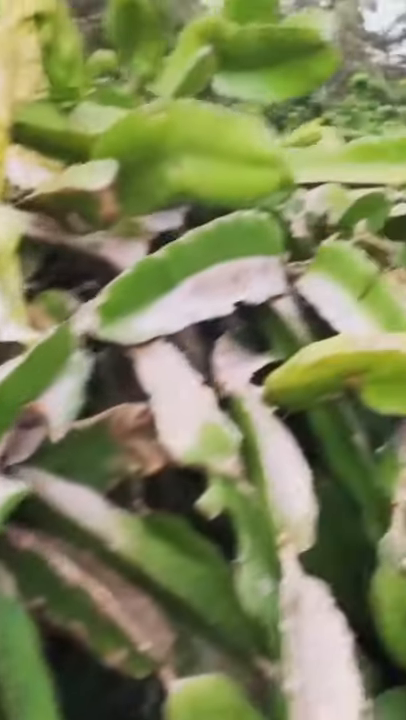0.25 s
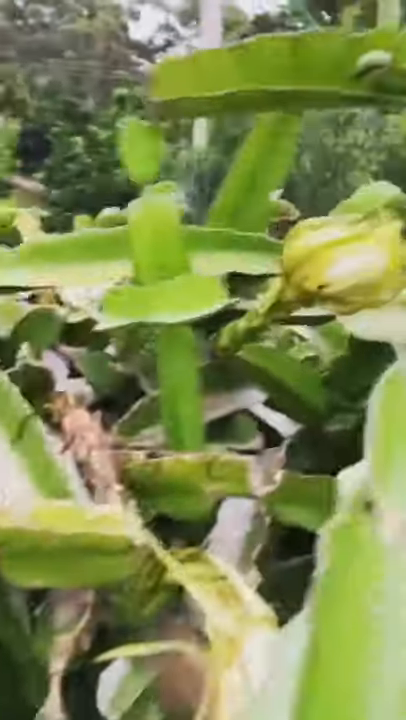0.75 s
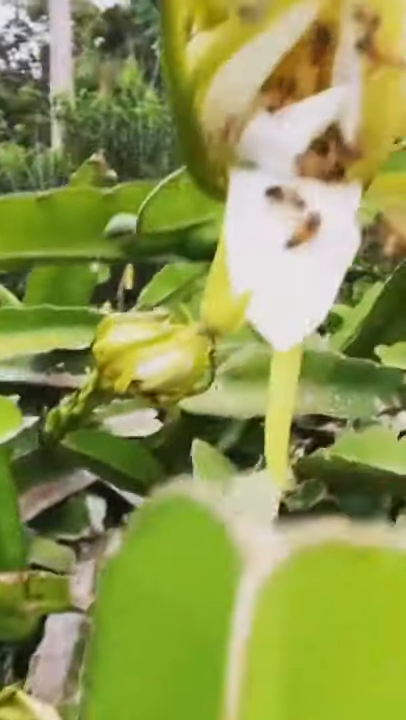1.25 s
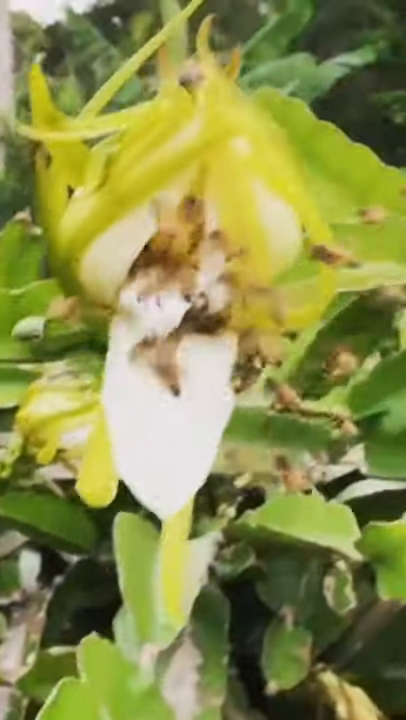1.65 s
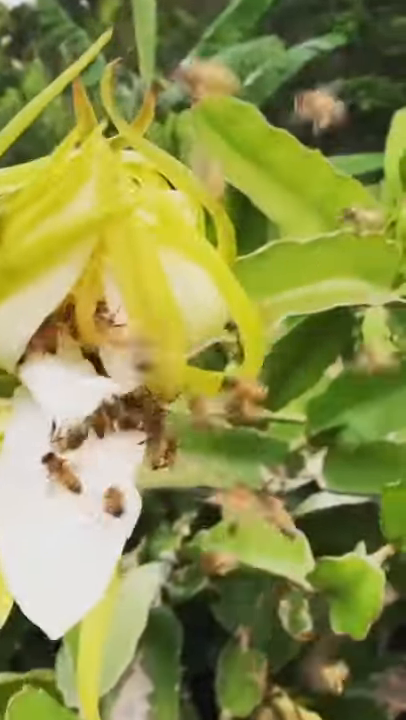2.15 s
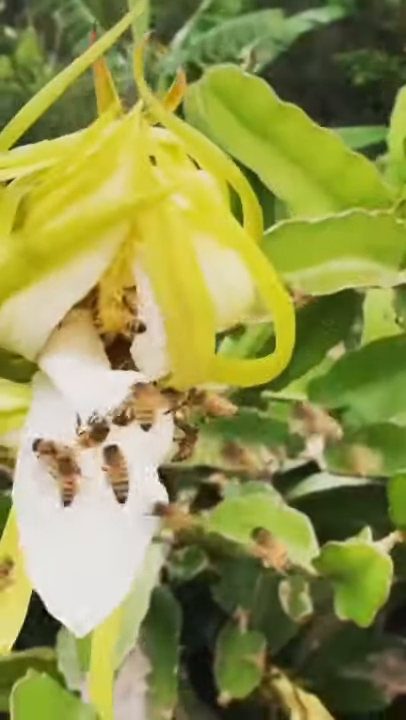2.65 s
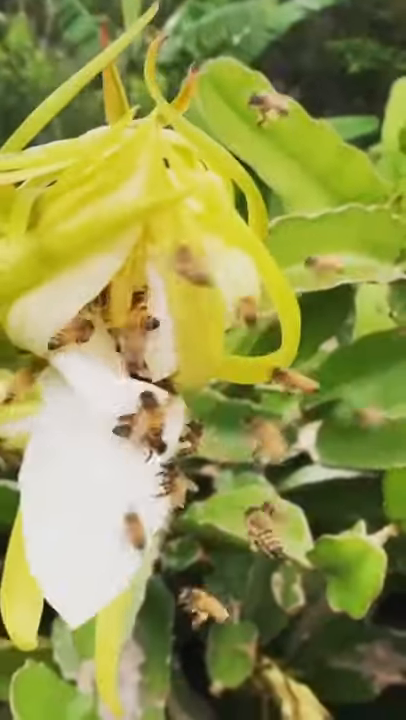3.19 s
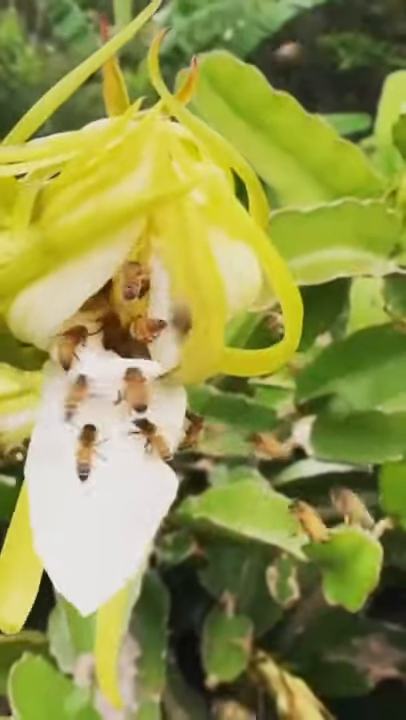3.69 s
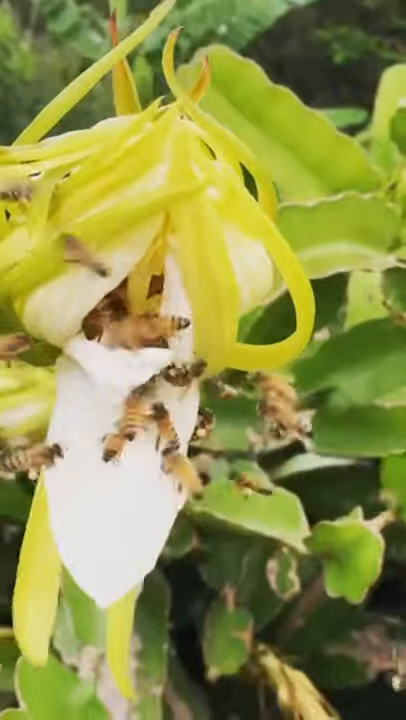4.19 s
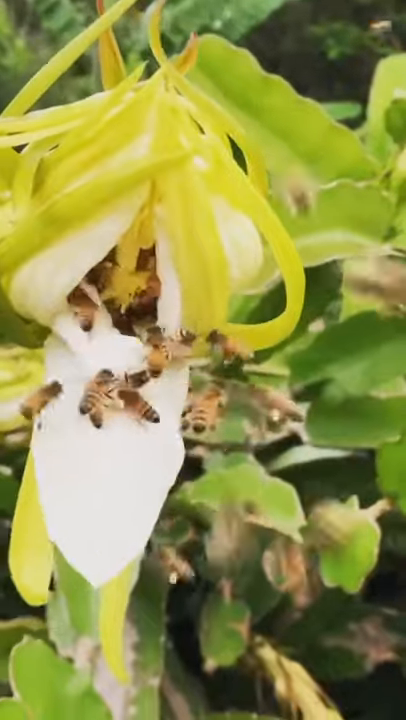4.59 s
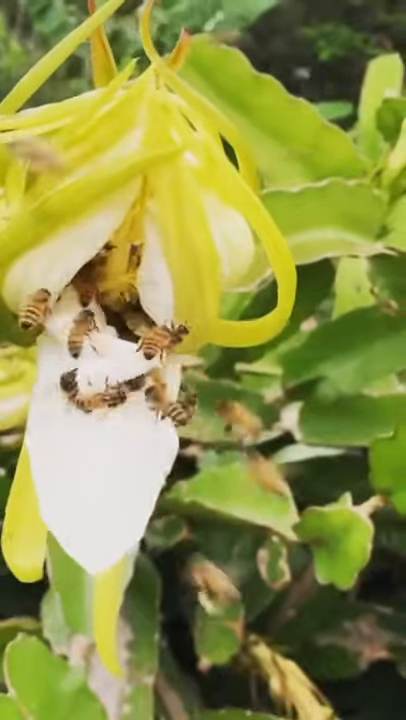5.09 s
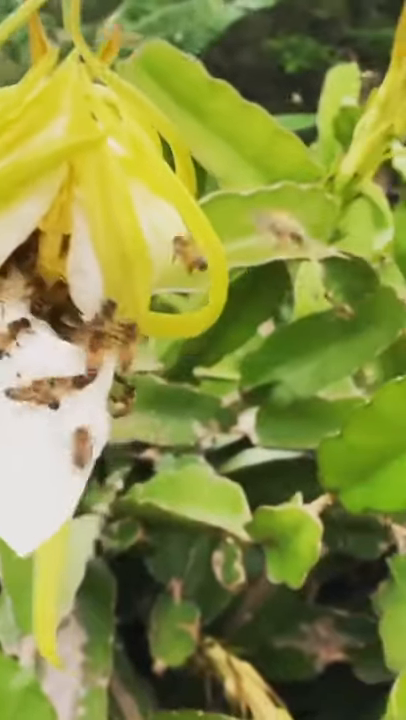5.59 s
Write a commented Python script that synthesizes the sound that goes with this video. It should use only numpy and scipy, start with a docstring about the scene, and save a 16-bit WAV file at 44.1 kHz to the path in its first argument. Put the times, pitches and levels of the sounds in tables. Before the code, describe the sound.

Close to a hand-held microphone in a garden, many bees buzz continuously at a flower. Early on, a few dart right past, their buzz surging and bending in pitch while their wings puff dull thumps against the microphone. Three more brief passes follow, then a bee swerves about and others hover in and out. A faint bed of airy hiss, high far insects and breeze rumble sits underneath, dipping briefly a few times.

```python
"""Honey bees at a cactus flower

Wingbeats hum close to a hand-held two-port microphone: a crowd forms the bed, the nearest bee
stands out, and now and then one skims the ports, which thump in its wing wash. Behind them are
shrill far insects, garden air, hiss, a low rumble and a faint whine and drone. The background
sinks into one long, shallow lull and three shorter, deeper dips."""
import sys
import numpy as np
from scipy import signal
from scipy.fft import rfft, irfft
from scipy.io import wavfile

SR = 44100
rng = np.random.default_rng(int(sys.argv[2]) if len(sys.argv) > 2 else 0)


def int16_out(signal):
    """Quantize to a 16-bit WAV file."""
    q = np.round(np.clip(np.atleast_2d(signal).T, -1, 1) * 32767)
    wavfile.write(sys.argv[1], SR, q.astype(np.int16))


N = 257544
TIME = np.arange(N) / SR
SIDES = np.array([[-.5], [.5]])  # splits a difference between the left and right ports


def amp(db):
    """Decibels to gain."""
    return 10 ** (np.asarray(db) / 20)


def unit(x):
    """Scales to rms 1."""
    return x / np.sqrt(np.mean(x ** 2) + 1e-20)


def at_hz(points, hz):
    """Reads a spectrum on a log-frequency axis."""
    f, value = np.transpose(points)
    return np.interp(np.log(hz + 1), np.log(f), value)


def curves(rows, x):
    """Reads each further column of a table where its first column is x."""
    first, *columns = np.transpose(rows)
    return [np.interp(x, first, c) for c in columns]


def drift(rate_hz):
    """Smooth random modulation of rms 1 that moves up to about rate_hz."""
    count = 2048
    f = np.fft.rfftfreq(count, N / SR / count)
    slow = irfft(rfft(rng.standard_normal(count)) * (f > 0) / np.sqrt(1 + (f / rate_hz) ** 4))
    return np.interp(TIME, np.linspace(0, N / SR, count), unit(slow))


def dip_db():
    """Ducking of the background: each dip falls quickly, stays down, then creeps back."""
    # one long, shallow lull and three shorter, deeper dips:
    # start/s, fall/s, hold/s, recovery/s, depth/dB
    dips = [(1.58, 0.017, 1.64, 0.013, 3), (1.585, 0.035, 0.28, 0.21, 13.5),
            (3.003, 0.094, 0.19, 0.038, 6.5), (5.462, 0.13, 0.041, 0.015, 5)]
    return -sum(depth * np.clip((TIME - start) / fall, 0, 1)
                * np.exp(-np.maximum(TIME - start - fall - hold, 0) / recovery)
                for start, fall, hold, recovery, depth in dips)


def noise_pair(spectrum):
    """Coloured ambient noise: it reaches the right port a little later and only partly alike."""
    # stereo image at the ports: f/Hz, likeness/0-1, left lead/rad, right over left/dB
    ports = [(0, 1, 0, 0), (200, .99, 0, 0), (1000, .3, 0, 2.5), (2200, .55, 1.6, 1), (3000, .5, 1.1, 0),
             (3900, .75, 2.05, 0), (4400, .99, 2.95, 0), (5000, .99, 3.4, 0), (5700, .85, 4.7, 0),
             (6500, .97, 6, 0), (7400, .97, 6.6, 0), (8000, .8, 7.9, 0), (8950, .99, 9.42, 0),
             (11050, .9, 12.57, 0), (13150, .98, 15.7, 0), (15100, .92, 18.8, 0)]
    hz = np.fft.rfftfreq(N, 1 / SR)
    left, unrelated = rfft(rng.standard_normal((2, N)))
    likeness, lead, right_db = curves(ports, hz)
    blend = likeness * left + np.sqrt(1 - likeness ** 2) * unrelated
    right = blend * np.exp(-1j * lead) * amp(right_db)
    return unit(irfft(np.array([left, right]) * amp(at_hz(spectrum, hz)), N))


def crowd(count=12, centre_hz=255, spread=.04, wander=.036, jitter=.0066, roam_db=5, right_db=3):
    """Many bees hum, each with its own wandering wingbeat, distance and bearing."""
    # overtone colour of a wing stroke: f/Hz, relative level/dB
    tone = [(760, 6.5), (1050, 5.5), (1300, 7), (1600, 5.5), (1850, -2), (2200, -32), (3200, -3.5),
            (4500, -68)]
    # fader ride of the crowd: t/s, level/dB
    ride = [(0, -51.5), (1.5, -52), (2.4, -55), (3.7, -53), (4.6, -54), (5.1, -56), (5.55, -57),
            (5.84, -52)]
    steps, lag_s = 1024, .00033  # wavetable size; longest delay between the ports
    orders = np.arange(3, 18)
    weights = amp(at_hz(tone, orders * centre_hz))
    cycle = np.linspace(0, 1, steps + 1)
    hum, octave, overtones = np.zeros((3, 2, N))
    for detune in np.linspace(-1, 1, count):
        hz = centre_hz * (1 + spread * detune + wander * drift(9) + jitter * drift(37.8))
        beats = np.cumsum(hz) / SR + SIDES * hz * lag_s * np.tanh(drift(0.98))
        index = (beats % 1 * steps).astype(int)
        nearness = amp(roam_db * drift(20.4))
        stroke = np.cos(2 * np.pi * (np.outer(cycle, orders) + rng.random(len(orders)))) @ weights
        hum += nearness * np.cos(2 * np.pi * cycle)[index]
        octave += nearness * np.cos(4 * np.pi * cycle)[index]
        overtones += nearness * stroke[index]
    # the crowd ducks part of the way with the background, its overtones a little further
    level = curves(ride, TIME)[0] + 0.27 * dip_db()
    return (unit(hum) * amp(level - 2)
            + unit(octave) * amp(level - 1 + SIDES * right_db / 2)
            + unit(overtones) * amp(level + 1 + 0.084 * dip_db() + SIDES * right_db))


def near_bee(span, hz, fundamental_db, octave_db, overtone_db, bright_hz, fall_db, hollow_db, jitter):
    """One bee: each wing stroke gives a fundamental, an octave, a hump of overtones and a puff of air."""
    flutter_db, right_db, puff_db = 2.8, 4, -15
    twist_rad, bearing_rad, fade_s = 0.44, 0.12, .015
    t = TIME[span]
    phase = 2 * np.pi * np.cumsum(hz * (1 + jitter * drift(44.5)[span])) / SR
    # the shape of the stroke, as the microphone hears it, twists while the bee turns
    slip = twist_rad * drift(10)[span] + SIDES * bearing_rad * drift(4.9)[span]
    octave = amp(octave_db + SIDES * right_db / 6) * np.cos(2 * phase + slip)
    buzz = amp(fundamental_db) * np.cos(phase) + octave
    orders = np.arange(3, 13)
    octaves_off_peak = abs(np.log2(orders * np.mean(hz) / bright_hz))
    hump = amp(-fall_db * octaves_off_peak - hollow_db * (orders % 2 == 0))
    for order, share in zip(orders, hump / np.linalg.norm(hump)):
        # the overtones beam, so they flutter and shift between the ports as the bee turns
        level = overtone_db + flutter_db * drift(19.5)[span]
        slip = 2 * np.pi * rng.random() + twist_rad * drift(12.4)[span] + SIDES * drift(2.7)[span]
        buzz += share * amp(level + SIDES * right_db) * np.cos(order * phase + slip)
    air_band = signal.butter(2, (600, 2000), "band", fs=SR, output="sos")
    stirred_air = signal.sosfilt(air_band, rng.standard_normal((2, N))[:, span])
    buzz += amp(overtone_db + puff_db) * unit(stirred_air * (1 + np.cos(phase)))
    fade = np.clip(np.minimum(t - t[0], t[-1] - t) / fade_s, 0, 1)
    out = np.zeros((2, N))
    out[:, span] = -np.sqrt(2) * buzz * fade
    return out


def hovering_bees(arrive_s=0.033, leave_s=0.053, sway=.021, bob_db=2.5):
    """Bees drift in, hang at the flower and leave: wingbeats sway, low partials bob as they turn."""
    # visits: start/s, length/s, wingbeat/Hz, fundamental/dB, octave over it/dB,
    # overtones over both/dB, brightest f/Hz
    visits = [(0, 0.42, 259.1, -52.5, -2, -11, 920), (0.871, 0.14, 257, -55.5, 10.5, -21, 1250),
              (1.12, 0.27, 251.4, -51, -7.5, -7.5, 930), (1.619, 0.18, 246, -56.5, 2.5, -17, 1400),
              (1.784, 0.11, 255.4, -51.5, 3.5, -24, 1500), (1.88, 0.15, 246.7, -48.5, -3, -12, 1390),
              (2.179, 0.18, 248.7, -52, -2.5, -12.5, 920), (2.34, 0.17, 252, -62.5, 7, -13, 990),
              (2.55, 0.25, 255.2, -53.5, 3.5, -9.5, 1240), (3.47, 0.28, 240.6, -53, 2, -9, 990),
              (3.68, 0.23, 239, -62.5, 6.5, -7, 950), (4.02, 0.25, 245.6, -57.5, 9.5, -12, 790),
              (4.491, 0.17, 257.7, -55, -1.5, -5, 1189), (4.651, 0.22, 256, -49.5, -7, -7.5, 1280),
              (4.95, 0.13, 253.3, -49, -6, -23, 920), (5.22, 0.15, 257, -55, 3.5, -11.5, 920),
              (5.63, 0.34, 254.3, -53, -11, -9.5, 1300)]
    out = np.zeros((2, N))
    for start, length, beat_hz, db, octave_db, overtone_db, bright_hz in visits:
        span = (TIME > start) & (TIME < start + length)
        age = TIME[span] - start
        fade = np.clip(np.minimum(age / arrive_s, (length - age) / leave_s), 1e-6, 1)
        level = db + 20 * np.log10(fade)
        hz = beat_hz * (1 + sway * drift(13)[span])
        fundamental = level + bob_db * drift(9)[span]
        octave = level + octave_db + bob_db * drift(9)[span]
        overtones = level + 10 * np.log10(1 + amp(octave_db) ** 2) + overtone_db
        out += near_bee(span, hz, fundamental, octave, overtones, bright_hz,
                        fall_db=19, hollow_db=1.5, jitter=.015)
    return out


def garden(air_db=-49.5, swell_db=1.16, shimmer_db=0.85, flicker_db=0.92):
    """The ambience: garden air, a shimmering chorus of far insects, fine hiss and a rumbling breeze."""
    # colours of the four noise beds: f/Hz, relative level/dB
    air = [(100, 11.5), (350, 8), (700, 10), (1300, 11), (1900, 16), (2200, 10.5), (2700, 12.5), (4200, 11),
           (7800, 11.5), (9500, -4)]
    insects = [(5500, -20.5), (6000, -6), (6400, 0.5), (6800, 3.5), (7250, -4.5), (7700, -17.5),
               (8600, -41)]
    hiss = [(5000, -11), (7400, -2.5), (8400, 6.5), (10500, 9), (13300, 9), (15500, 10)]
    rumble = [(20, -4), (32, -2), (42, 3), (57, 10), (100, 1.5), (160, -7.5), (300, -10.5), (700, -43)]
    # fader rides for air and insects together, for hiss and for breeze: t/s, level/dB
    presence_ride = [(0, -50), (.3, -52.5), (.6, -48.5), (1.5, -48.5), (2.5, -50.5), (3.5, -49), (4.6, -49),
                     (5.84, -51)]
    hiss_ride = [(0, -51), (1.5, -49), (1.9, -48.5), (3.2, -49), (4.3, -50.5), (5.84, -53)]
    breeze_ride = [(0, -55), (.3, -53.5), (.6, -56), (2.0, -55), (2.4, -64), (3.2, -60.5), (3.9, -53.5),
                   (5.84, -55)]
    presence_db = curves(presence_ride, TIME)[0] + dip_db() + swell_db * drift(6.4)
    hiss_db, = curves(hiss_ride, TIME)
    breeze_db, = curves(breeze_ride, TIME)
    return (noise_pair(air) * amp(air_db + 0.95 * (presence_db - np.median(presence_db)))
            + noise_pair(insects) * amp(presence_db - 1 + shimmer_db * drift(65))
            + noise_pair(hiss) * amp(hiss_db + 1.9 + flicker_db * drift(30))
            + noise_pair(rumble) * amp(breeze_db))


def whine(waver_hz=14):
    """Two faint, thin tones waver in the distance and duck with the background."""
    # far tones: f/Hz, level/dB
    tones = [(1817, -66.5), (1912, -64.5)]
    wavering = sum(amp(db) * drift(waver_hz) * np.sqrt(2) * np.cos(2 * np.pi * hz * TIME)
                   for hz, db in tones)
    return wavering * amp(dip_db())


def drone(waver_hz=9):
    """A faint low drone swells out of the rumble now and then."""
    # swells: middle/s, half length/s, f/Hz, level/dB
    swells = [(.25, .09, 99.6, -53), (3.923, 0.2, 118.2, -57.5), (5.72, 0.066, 110, -51)]
    out = np.zeros(N)
    for middle, half, hz, db in swells:
        envelope = amp(db) * np.exp(-((TIME - middle) / half) ** 2)
        out += envelope * drift(waver_hz) * np.sqrt(2) * np.cos(2 * np.pi * hz * TIME)
    return out


def fly_bys(overtone_trim_db=-1.7):
    """Bees skim the microphone: each buzz swells fast and bends as the bee banks away."""
    # one path per close swell of buzzing:
    # t/s, wingbeat/Hz, fundamental/dB, octave/dB, overtones before trim/dB
    paths = [
        [(0.315, 270, -48, -38, -47), (0.337, 254.8, -36.5, -46, -44), (0.349, 262, -52, -41.5, -58),
         (0.391, 273.5, -37.5, -47, -52), (0.443, 255.4, -25, -29.5, -39.5), (0.469, 242.8, -40, -33, -44),
         (0.505, 249, -34, -46, -51)],
        [(0.515, 261.6, -37, -44, -51), (0.533, 243.6, -42, -40.5, -48), (0.571, 246.7, -32, -46, -44.5),
         (0.605, 236, -35.5, -37, -43), (0.627, 241, -34.5, -47, -45), (0.647, 243, -33.5, -38, -43),
         (0.672, 235.2, -34, -49, -60)],
        [(0.655, 231, -44, -46, -54), (0.69, 223.7, -38, -42, -48.5), (0.73, 237.7, -34, -39, -44),
         (0.755, 243.6, -44, -40, -52.5), (0.785, 247, -41, -44, -47), (0.815, 244, -54, -54, -55)],
        [(1.49, 241, -43, -48, -47), (1.504, 272.6, -55, -49, -51), (1.53, 271.6, -35.5, -42, -48.5),
         (1.576, 253, -31.5, -35, -42.5), (1.592, 257.8, -31.5, -40, -53), (1.612, 258, -47, -49, -59)],
        [(2.0, 237.5, -43, -62, -59), (2.014, 261.5, -50, -46, -47), (2.054, 240.6, -45, -68, -52),
         (2.094, 251, -33, -44, -44), (2.136, 248.8, -26.5, -35.5, -55), (2.17, 245.4, -42, -48, -48.5),
         (2.186, 260.6, -44, -45, -57), (2.215, 260, -56, -56, -53)],
        [(2.92, 260, -55, -58, -55), (2.988, 259.7, -36.5, -42, -47.5), (3.048, 271.2, -42, -49, -53),
         (3.054, 266.4, -52, -53, -69), (3.078, 258.6, -43, -49.5, -53), (3.125, 255, -77, -51, -55)],
    ]
    # each swell's overtone hump: brightest f/Hz, fall either side/dB per octave, even-overtone cut/dB
    colours = [(940, 23, 5), (1100, 21, 4.5), (720, 13, -3), (1000, 10, 3), (1050, 18, 4.5),
               (865, 12, -0.5)]
    out = np.zeros((2, N))
    for path, colour in zip(paths, colours):
        span = (TIME > path[0][0]) & (TIME < path[-1][0])
        hz, fundamental, octave, overtones = curves(path, TIME[span])
        out += near_bee(span, hz, fundamental, octave, overtones + overtone_trim_db, *colour, jitter=.009)
    return out


def wing_wash(trim_db=0.5, turbulence=.3):
    """Eddies from the wings thump the ports: each a quick push that slows as it dies."""
    # thumps: t/s, level before trim/dB, starting f/Hz, final f/Hz, swell/s
    gusts = [(0.327, -38, 75, 60, .008), (.355, -32, 95, 68, .009), (.391, -32, 80, 55, .007),
             (.465, -39, 95, 60, 0.0073), (0.4937, -23.5, 145, 46, 0.0075), (0.82, -40.5, 101, 55, 0.011),
             (1.611, -33.5, 220, 65, 0.0042), (1.772, -44, 62, 50, 0.004), (2.132, -31.5, 82, 42, 0.019),
             (2.205, -42, 62, 50, 0.007)]
    out = np.zeros(N)
    for start, db, start_hz, end_hz, swell_s in gusts:
        progress = np.maximum(TIME - start, 0) / swell_s  # 1 at the peak
        envelope = amp(db + trim_db) * progress * np.exp(1 - progress)
        hz = end_hz + (start_hz - end_hz) * np.exp(-progress / 2)
        eddy = -np.sin(2 * np.pi * np.cumsum(hz * (progress > 0)) / SR)
        out += envelope * (eddy + turbulence * drift(start_hz))
    return out


def swerving_bee(bob_db=2):
    """One bee zigzags in front of the petal: its wingbeat jumps at every turn."""
    # pitch line of the zigzag: t/s, wingbeat/Hz
    pitch = [(3.38, 264.4), (3.46, 260.4), (3.5, 263.8), (3.56, 248.9), (3.6, 254.7), (3.64, 278.3),
             (3.685, 241.1), (3.72, 267.9), (3.755, 243.2), (3.82, 251.5), (3.885, 267), (3.93, 244.5),
             (3.97, 248.1), (4.005, 267.4), (4.04, 250.3), (4.08, 249.5), (4.115, 265.5), (4.16, 247.7),
             (4.21, 254.2), (4.26, 269), (4.315, 244.6), (4.37, 269.1), (4.41, 257.8), (4.455, 247.2),
             (4.5, 252.8)]
    # its fader ride: t/s, fundamental/dB, octave/dB
    ride = [(3.38, -55, -39), (3.428, -45, -60), (3.46, -40, -42), (3.492, -47, -47), (3.538, -42, -45),
            (3.6, -47.5, -51.5), (3.838, -48.5, -42), (3.89, -87, -41.5), (3.946, -51.5, -48),
            (4.118, -52, -48.5), (4.162, -48, -49), (4.236, -64, -47.5), (4.262, -54, -47),
            (4.334, -79, -49), (4.418, -51.5, -46.5), (4.5, -58, -51.5)]
    span = (TIME > pitch[0][0]) & (TIME < pitch[-1][0])
    hz, = curves(pitch, TIME[span])
    fundamental, octave = curves(ride, TIME[span]) + bob_db * drift(14)[span]
    return near_bee(span, hz, fundamental, octave, overtone_db=octave - 10,
                    bright_hz=1110, fall_db=3.5, hollow_db=5, jitter=.016)


def scene():
    """The bees in front, the garden behind."""
    bees = fly_bys() + hovering_bees() + swerving_bee() + crowd()
    return bees + wing_wash() + garden() + whine() + drone()


def record(dry):
    """The microphone sheds the deepest bass and the recorder cuts the top treble."""
    low_cut = signal.butter(2, 30, "high", fs=SR, output="sos")
    high_cut = signal.firwin(511, 15550, window=("kaiser", 9), fs=SR)
    return signal.oaconvolve(signal.sosfilt(low_cut, dry), high_cut[None], "same")


dry = scene()
out = record(dry)
int16_out(out)
```